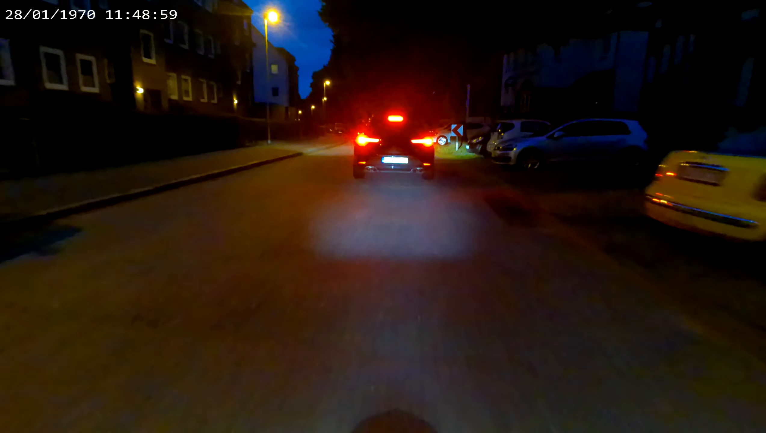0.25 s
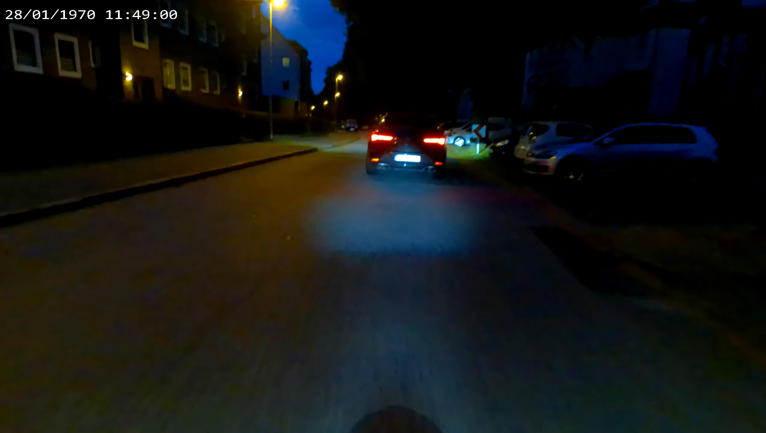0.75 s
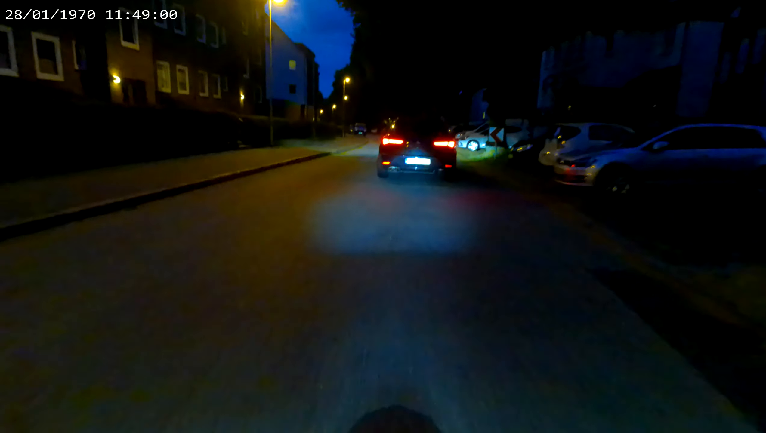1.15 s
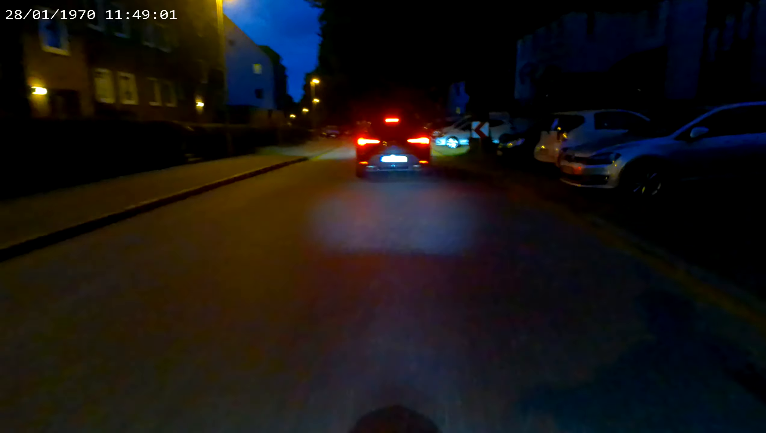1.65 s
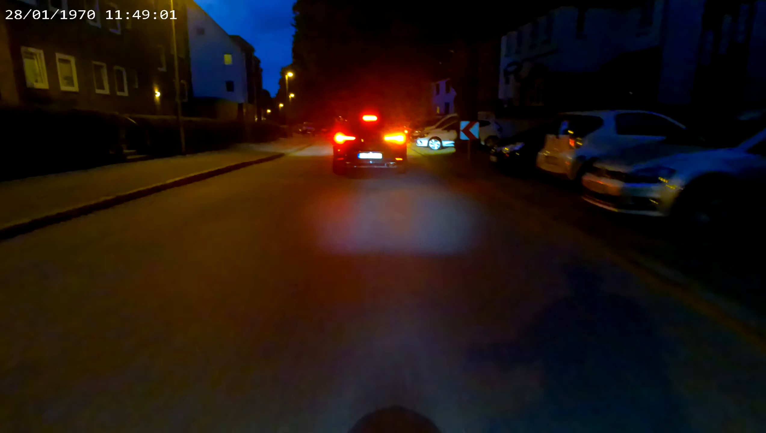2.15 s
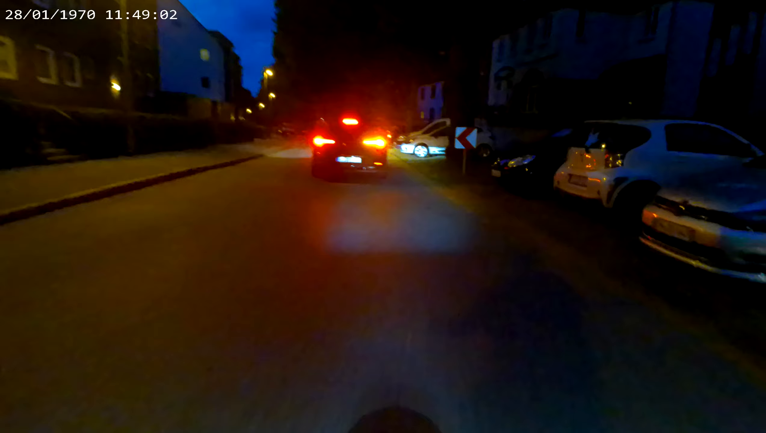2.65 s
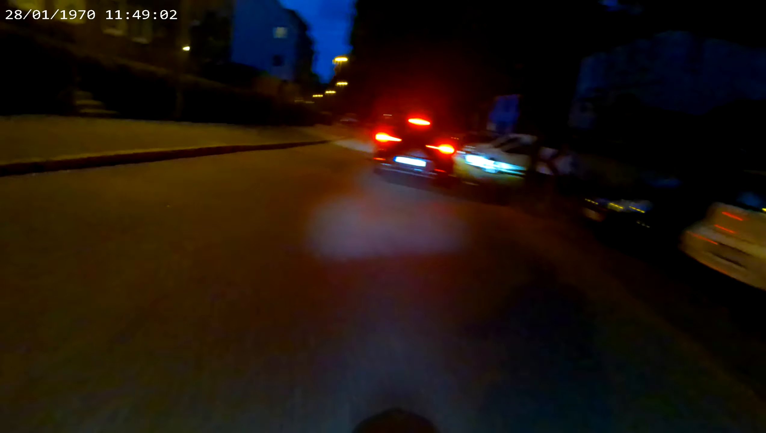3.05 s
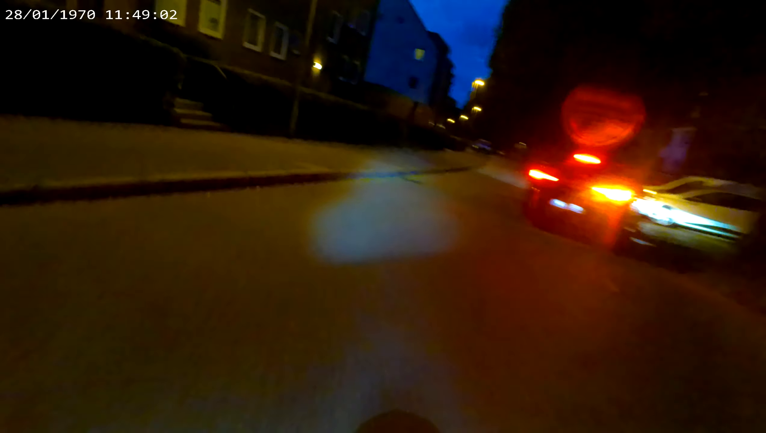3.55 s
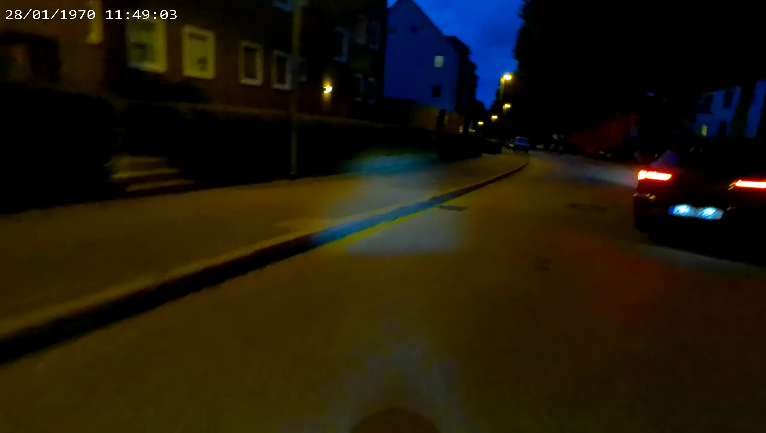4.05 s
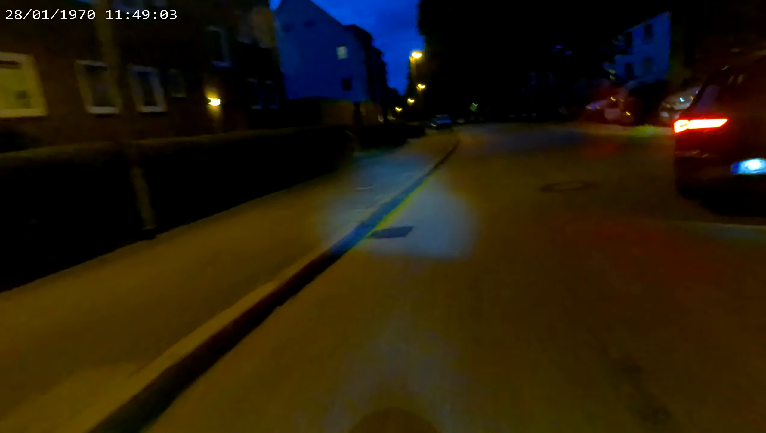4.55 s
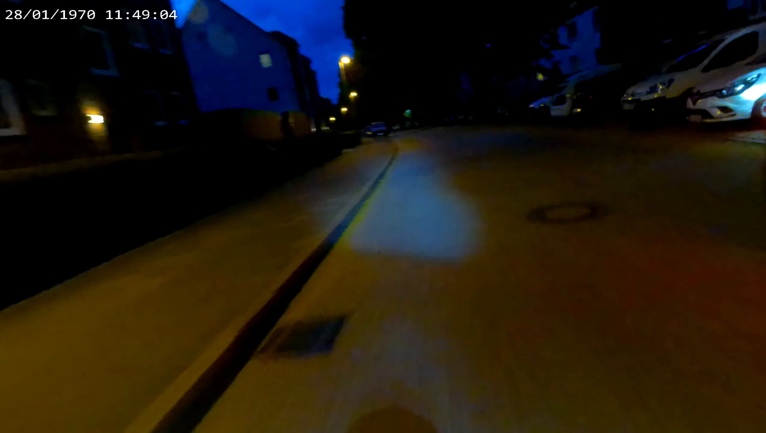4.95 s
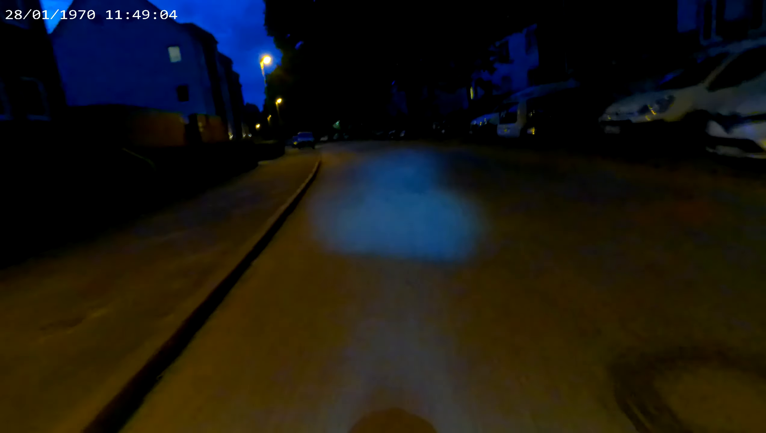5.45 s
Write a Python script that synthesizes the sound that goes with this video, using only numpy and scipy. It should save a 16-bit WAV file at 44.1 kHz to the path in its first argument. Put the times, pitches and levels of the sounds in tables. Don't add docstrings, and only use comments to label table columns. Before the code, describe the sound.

A mono, close, bass-heavy ride on an electric bike along a quiet street, picked up by a camera clamped to the handlebar. A low hum near 176 Hz throbs in short irregular pulses over frame rumble, muffled tyre roar and deep fluttering air. From 0 to 0.8 s a brake pad rubs with a dry, gritty mid-range rasp and faint sizzling bites, firmer after 0.4 s, then lets go abruptly with a knock and a heavy bump. Coasting is quieter; the handlebar flexes deeply around 1.4-1.7 s, with a sharp stone tick at 1.55 s. A rattling cluster of stone knocks comes at 2.6 s. The motor growls roughly from 2.6 to 5.3 s in surges. Tiny clicks fall at 4.3 and 4.65 s, with another deep flex near 4.8 s. Roar, air and hum build to the loudest, slightly clipped throbs after 5 s. Thin hiss and rapid faint ticking persist.

```python
import sys
import numpy as np
from scipy import signal
from scipy.fft import rfft, irfft, next_fast_len
from scipy.io import wavfile
from scipy.ndimage import map_coordinates

SR = 44100
rng = np.random.default_rng(int(sys.argv[2]) if len(sys.argv) > 2 else 0)


def inscribe(sig):
    pcm = np.round(np.clip(np.atleast_2d(sig).T, -1, 1) * 32767)
    wavfile.write(sys.argv[1], SR, pcm.astype(np.int16))


def magnitude_from_level(level_db):
    exponent = np.asarray(level_db, float) / 20
    return 10 ** exponent


N = 250929

# time in seconds, level in dB.
ROAR_LEVEL = [
    (0, -40.5),
    (.9, -43),
    (1.8, -43),
    (3.29, -41.5),
    (3.45, -40),
    (4.4, -39),
    (5.01, -37),
    (5.5, -35.5),
    (5.69, -36),
]


def unit(x):
    return x / np.sqrt(np.mean(x ** 2) + 1e-20)


def along(points, hz):
    f, v = np.transpose(points)
    return np.interp(np.log(hz + 1), np.log(f + 1), v)


def curves(rows):
    s, *cols = np.transpose(rows)
    return [np.interp(np.arange(N) / SR, s, c) for c in cols]


def wobble(rate):
    knots = rng.standard_normal(int(N * rate / SR) + 4)
    return map_coordinates(knots, [np.arange(N) * rate / SR])


def filtered(x, response):
    m = next_fast_len(N + SR // 2)
    return irfft(rfft(x, m) * response(np.fft.rfftfreq(m, 1 / SR)), m)[:N]


def modes(table):
    def response(f):
        return sum((-1) ** k * magnitude_from_level(db) * 1j * f * w / (c * c - f * f + 1j * f * w)
                   for k, (c, w, db) in enumerate(table))
    return response


def muffle(hz):
    return lambda f: 1 / (1 + 1.3j * f / hz - (f / hz) ** 2) ** 2


def rush(spectrum, lumpy_db, rate):
    drive = rng.standard_normal(N) * magnitude_from_level(lumpy_db * wobble(rate))
    return unit(filtered(drive, lambda hz: magnitude_from_level(along(spectrum, hz))))


def throbbing(rows, rest_hz, idle_db, edge_s, dome_db, drift):
    t, out, busy = np.arange(N) / SR, np.zeros(N), np.zeros(N)
    for s, length, db, hz in rows:
        k = slice(max(round((s - .2) * SR), 0), round((s + length + .2) * SR))
        since, left = t[k] - s, t[k] - s - length
        held = (np.tanh(since / edge_s) - np.tanh(left / edge_s)) / 2
        dome = magnitude_from_level(db + 0.31 - dome_db * (2 * since / length - 1) ** 2)
        out[k] += dome * held * np.sin(2 * np.pi * hz * since + drift[k])
        busy[k] += (np.tanh(since / edge_s + 0.8) - np.tanh(left / edge_s - 1.1)) / 2
    idle_level = magnitude_from_level(idle_db + 4.9 * np.tanh(wobble(rest_hz / 7)))
    idle = idle_level * np.sin(2 * np.pi * rest_hz * t + 1.8 * drift)
    return np.sqrt(2) * (out + np.clip(1 - busy, 0, 1) * idle)


def clamp():
    # start in seconds, length in seconds, level in dB, pitch in Hz.
    throbs = [(.085, .175, -13.5, 176.5), (.319, 0.023, -11.5, 179), (.442, .093, -14.5, 176.5),
              (.804, 0.1, -10, 173.4), (1.097, 0.19, -12, 176.1), (1.324, 0.049, -11.5, 176.5),
              (1.508, 0.066, -13, 181.2), (2.115, 0.08, -10, 179.4), (2.225, 0.095, -13, 179),
              (2.35, 0.039, -12, 176.6), (2.442, 0.17, -14.5, 176), (2.608, 0.1, -13, 172.4),
              (2.755, 0.14, -13, 179.5), (2.899, 0.069, -15, 181.9), (3.045, 0.061, -13.5, 177),
              (3.202, 0.057, -14, 179), (3.398, 0.067, -11, 177), (3.591, 0.043, -10, 181),
              (3.953, 0.066, -11.5, 170.5), (4.058, 0.08, -13, 174.4), (4.144, 0.14, -13.5, 172),
              (4.296, 0.051, -11, 180), (4.362, 0.18, -8.5, 176.5), (4.589, 0.14, -10, 173.6),
              (4.817, 0.14, -13.5, 180.5), (4.978, 0.15, -9.5, 174.4), (5.156, .064, -8.5, 178.5),
              (5.23, 0.2, -8, 177.2), (5.453, 0.13, -6.5, 178.6), (5.6031, 0.19, -9.5, 181.3)]
    # time in seconds, change in dB.
    surges = [(.825, 3), (.847, 2), (.878, 3.5), (.145, 2), (4.412, 2.5), (4.441, 2.5), (4.646, 2),
              (4.888, -2), (4.907, 3), (5.045, 2.5), (5.178, 1.5), (5.192, 4), (5.259, 4.5), (5.33, 1.5),
              (5.355, 2), (5.372, -2), (5.391, 4), (5.482, 3), (5.5, 2), (5.546, 2.5)]
    t = np.arange(N) / SR
    jolts = 1 + .05 * wobble(45) + .05 * wobble(130)
    surge_db = sum(size_db * np.exp(-((t - s) / .008) ** 2) for s, size_db in surges)
    hum = throbbing(throbs, rest_hz=176.5, idle_db=-20.5, edge_s=0.011, dome_db=4, drift=.52 * wobble(30))
    return magnitude_from_level(surge_db) * jolts * hum


def sway():
    # start in seconds, length in seconds, level in dB, pitch in Hz.
    flexes = [(0.041, 0.21, -19, 27.75), (0.51, 0.032, -21, 24.9), (0.755, 0.052, -21.5, 30.1),
              (0.836, 0.32, -16.5, 27.27), (1.211, 0.152, -22, 26.37), (1.41, 0.32, -12.5, 29.24),
              (1.87, 0.064, -22.5, 22.2), (2.479, 0.032, -23.5, 26), (4.552, 0.106, -20, 22.64),
              (4.697, 0.068, -20.5, 20.9), (4.764, 0.174, -12, 22.15), (5.201, 0.1, -22.5, 26.42),
              (5.432, 0.082, -20.5, 28.86), (5.554, 0.088, -21.5, 28.12)]
    bend = throbbing(flexes, rest_hz=24.3, idle_db=-27.5, edge_s=.04, dome_db=5.5, drift=0.23 * wobble(7))
    return magnitude_from_level(0.72 * wobble(8.2)) * bend


def buffeting():
    # time in seconds, level in dB.
    gusts = [(0, -28.5), (.7, -30.5), (.82, -23.5), (1.5, -25), (1.62, -29.5), (1.9, -29.5), (2.45, -31),
             (2.9, -37.5), (4.45, -33), (5.07, -24.5), (5.69, -20.5)]
    # frequency in Hz, density in dB per Hz.
    flutter = [(4, -28), (12, 1.5), (20, -4), (27, -4.5), (34, -4.5), (44, -1.5), (54, -11), (70, -16),
               (90, -21.5), (120, -43.5), (200, -120)]
    (gust_db,) = curves(gusts)
    return magnitude_from_level(gust_db + 4.5) * rush(flutter, .4, 16.0)


def shake():
    # frequency in Hz, density in dB per Hz.
    frame = [(30, -120), (50, -21.5), (70, -3.5), (90, -4.5), (120, 0), (145, 0), (165, 0), (200, -25),
             (400, -120)]
    fork = [(80, -120), (165, -12.5), (200, 4), (250, -6.5), (300, -3.5), (335, -5.5), (370, -21),
            (420, -19.5), (520, -43), (1000, -120)]
    # time in seconds, frame lift in dB, fork lift in dB.
    bumps = [(.11, 1.5, 2.5), (.815, 11.5, 3.5), (1.11, 5, -1), (1.522, 10, -3), (2.581, 2.5, 4),
             (2.78, 3, 3), (2.881, 2.5, -5), (3.64, 1.5, 6), (4.2, 5.5, 0.5), (4.531, 3.5, 2), (5.5, 3, 0)]
    bump_s = .045
    t = np.arange(N) / SR
    (tyre_db,) = curves(ROAR_LEVEL)
    swell_db = tyre_db - tyre_db.mean()
    bump_db = sum(np.outer(sizes_db, np.exp(-((t - s) / bump_s) ** 2)) for s, *sizes_db in bumps)
    frame_db = -27.5 + 0.21 * swell_db + bump_db[0]
    fork_db = -25 + .4 * swell_db + bump_db[1]
    return magnitude_from_level(frame_db) * rush(frame, 0.47, 19) + magnitude_from_level(fork_db) * rush(fork, 1.0, 14)


def tyres():
    # frequency in Hz, density in dB per Hz.
    tread = [(220, -30.5), (380, -3), (411, 1.5), (456, -6), (712, 1.5), (840, -13), (1010, -12.5),
             (1150, -13), (1430, -15), (1660, -6.5), (1870, -13), (2080, -26), (3050, -42.5), (3960, -67.5),
             (6710, -120)]
    # frequency in Hz, width in Hz, lift in dB.
    cavities = [(705, 120, -5), (1027, 40, 7.5), (1284, 91, 7), (1540, 130, 2.5), (1700, 120, 0.5),
                (2130, 150, 1.5), (2490, 170, 7)]
    (tyre_db,) = curves(ROAR_LEVEL)

    def lift(hz):
        return magnitude_from_level(sum(db / (1 + (2 * (hz - c) / w) ** 2) for c, w, db in cavities))

    roar = unit(filtered(rush(tread, 1.0, 40), lift))
    return magnitude_from_level(tyre_db + 2.5 + .8 * wobble(8)) * roar


def brake():
    # frequency in Hz, width in Hz, level in dB.
    disc = [(612, 79, -10), (1090, 60, -10.5), (1290, 19, -6.5), (1620, 128, 2), (1781, 139, 1),
            (2290, 170, -15), (2630, 280, -25.5), (3890, 200, -0.5), (4660, 160, 1.5)]
    # time in seconds, lift in dB.
    bites = [
        (.005, 8),
        (.216, 10),
        (.31, 10),
        (.354, 8),
        (.49, 11),
        (.56, 10),
        (.632, 13),
        (.684, 7),
        (.748, 11),
        (.796, 7),
    ]
    let_go_s, release_db_per_s = 0.792, 331.5
    squeeze_s, squeeze_db = .42, 2.5
    warp_hz, warp_s, warp_db = 5.8, .32, 1.1
    t = np.arange(N) / SR
    release_db = -release_db_per_s * np.clip(t - let_go_s, 0, 1)
    tight = np.tanh((t - squeeze_s) / 0.018) / 2 + .5
    warp = np.cos(2 * np.pi * warp_hz * (t - warp_s))
    rub_db = -34 + squeeze_db * tight + warp_db * warp + release_db
    bite_db = sum(db * np.exp(-((t - s) / 0.022) ** 2) for s, db in bites)
    sizzle_db = -75.5 + bite_db + release_db
    slips = rng.standard_normal(N) * magnitude_from_level(1.4 * wobble(120) + .7 * wobble(30))
    rub = unit(filtered(filtered(slips, modes(disc[:7])), muffle(2600)))
    groan = unit(filtered(slips, modes(disc[:1])))
    sizzle = unit(filtered(filtered(slips, modes(disc[7:])), modes(disc[7:])))
    return magnitude_from_level(rub_db + 1.2) * (rub + magnitude_from_level(-15.5) * tight * groan) + magnitude_from_level(sizzle_db) * sizzle


def knocks():
    # time in seconds, then peak, low, upper and
    # top group levels in dB.
    hits = [(.789, -25.5, -10, -21, -45), (1.553, -30, -20, 1, -4), (1.558, -39.5, -15.5, -7, -17),
            (2.5817, -31.5, -4, 2, -58.5), (2.586, -28, 15, -14.5, -45.5), (2.5876, -29.5, 9, -10, -44),
            (2.593, -28, 2, -19, -46), (2.601, -41, 10.5, -24.5, -38), (2.609, -41, 13, -24.5, -40),
            (4.2805, -61, -23, -5, 15), (4.282, -61, -25, -6, 16.5), (4.647, -33.5, -13, -3, -16)]
    # frequency in Hz, width in Hz, level in dB.
    strut = [
        [(1200, 390, -2), (1580, 330, 8), (1950, 160, -4.5)],
        [(610, 54, -6.5), (780, 110, 5.5), (1096, 88, -0.5)],
        [(2257, 140, 4.5), (2500, 400, 1.5)],
        [(3150, 440, -4), (3900, 500, -4.5), (5130, 610, 2.5)],
    ]
    shut_hz = [2130, 1400, 2800, 6500]
    blows, t = np.zeros((4, N)), np.arange(SR // 50) / SR
    for s, db, low_db, upper_db, top_db in hits:
        scrape = 0.082 * rng.standard_normal(len(t)) * magnitude_from_level(-60 * t / 0.017)
        burst = (t == 0) + scrape
        levels = db + np.array([[31], [low_db + 35.0], [upper_db + 28.0], [top_db + 26.5]])
        blows[:, round(s * SR):][:, :len(t)] += magnitude_from_level(levels) * burst
    out = np.zeros(N)
    for blow, group, hz in zip(blows, strut, shut_hz):
        ring = filtered(blow, modes(group))
        out += filtered(filtered(ring, muffle(hz)), muffle(1.13 * hz))
    return out


def motor():
    # time in seconds, pitch in Hz, level in dB.
    growl = [
        (2.6, 121.8, -36),
        (2.9, 120, -25.5),
        (3.19, 125, -30.5),
        (3.348, 105, -37),
        (3.64, 108, -27.5),
        (4.021, 110.1, -33.5),
        (4.46, 117.7, -26),
        (5.041, 130.8, -28),
        (5.3, 145.4, -34),
    ]
    hz, db = curves(growl)
    t = np.arange(N) / SR
    pulling = np.clip(np.minimum(t - growl[0][0], growl[-1][0] - t) / 0.21, 0, 1)
    level = magnitude_from_level(db + 4.2 * np.tanh(wobble(10)))
    phase = 2 * np.pi * np.cumsum(hz) / SR + 0.22 * wobble(14)
    return np.sqrt(2) * pulling * level * np.sin(phase)


def circuit():
    # frequency in Hz, density in dB per Hz.
    hiss = [(2200, -30), (2800, 2.5), (3300, 1), (4000, 2.5), (5500, 0.5), (7500, -1), (9000, -1.5),
            (11500, -0.5), (12000, 2), (15700, 2), (17000, -63.5)]
    # time in seconds, level in dB.
    bursts = [
        (.0185, -1),
        (.0235, -1.5),
        (.003, -11),
        (.0075, -10.5),
    ]
    # frequency in Hz, rms level in dB.
    clocks = [(8075, -85), (11649, -84.5), (12489, -90)]
    frame_hz = 30
    t = np.arange(N) / SR
    gate = sum(magnitude_from_level(db) * np.exp(-((t - s) * frame_hz % 1) / (.0025 * frame_hz)) for s, db in bursts)
    board = modes([(4600, 500, -7.0), (6740, 620, -3), (13400, 4500, -13.5)])
    ticks = unit(filtered(gate * rng.standard_normal(N), board))
    ticks = ticks + 0.68 * unit(gate) * np.sin(2 * np.pi * 6700 * t + 3 * wobble(60))
    tick_db = -69 + 2.7 * np.exp(-((t - 1.1) / 0.64) ** 2)
    writing = (t - .5) % 1.04 < .2
    write_noise = unit(filtered(rng.standard_normal(N), modes([(12100, 900, 0)])))
    tones = sum(np.sqrt(2) * magnitude_from_level(db) * np.sin(2 * np.pi * hz * t) for hz, db in clocks)
    steady = magnitude_from_level(-61.5) * rush(hiss, .4, 30) + tones
    return steady + magnitude_from_level(tick_db) * unit(ticks) + magnitude_from_level(-70.0) * writing * write_noise


def scene():
    ride = clamp() + sway() + buffeting() + shake() + tyres()
    return (ride + brake() + knocks() + motor() + circuit())[None]


def low_pass(x):
    return signal.sosfilt(signal.butter(12, 15720, fs=SR, output="sos"), x)


def record(dry):
    x = dry - .028
    crest = x / (1 + np.abs(x / .71) ** 16) ** (1 / 16)
    x = np.where(x > 0, crest, np.maximum(x, -.703))
    return low_pass(x)


dry = scene()
out = record(dry)
inscribe(out)
```